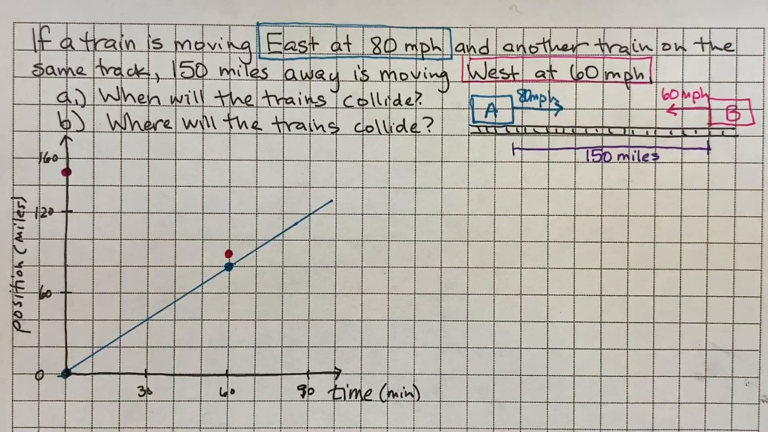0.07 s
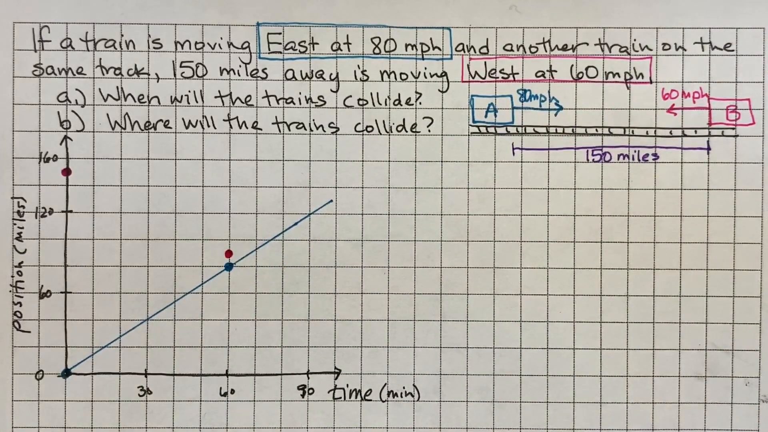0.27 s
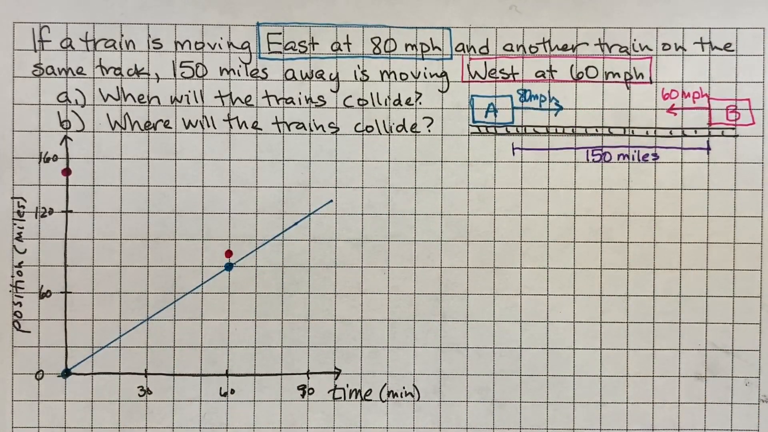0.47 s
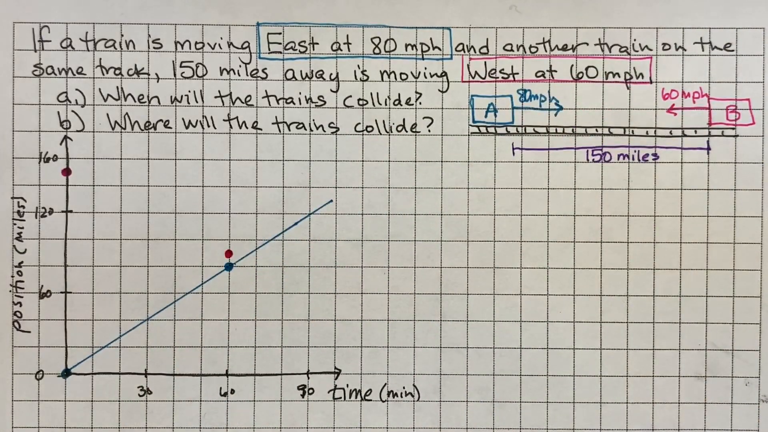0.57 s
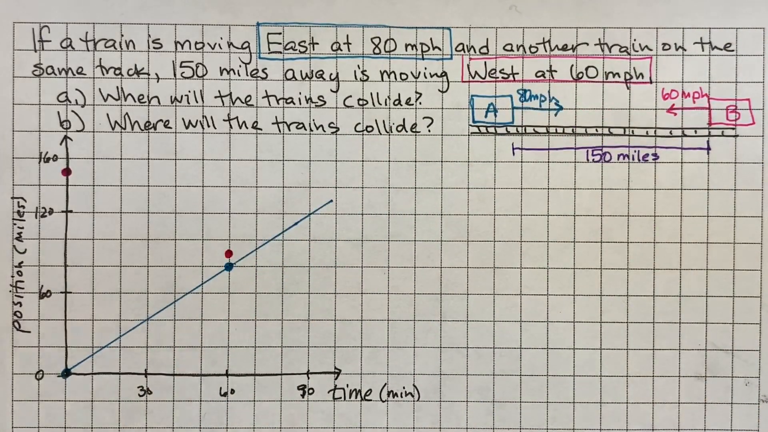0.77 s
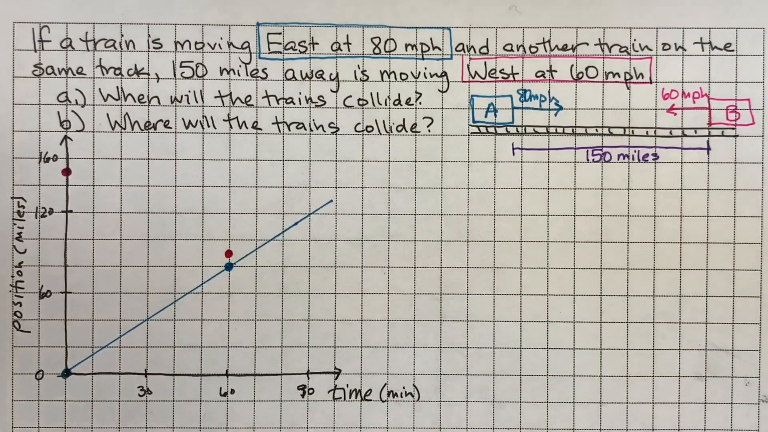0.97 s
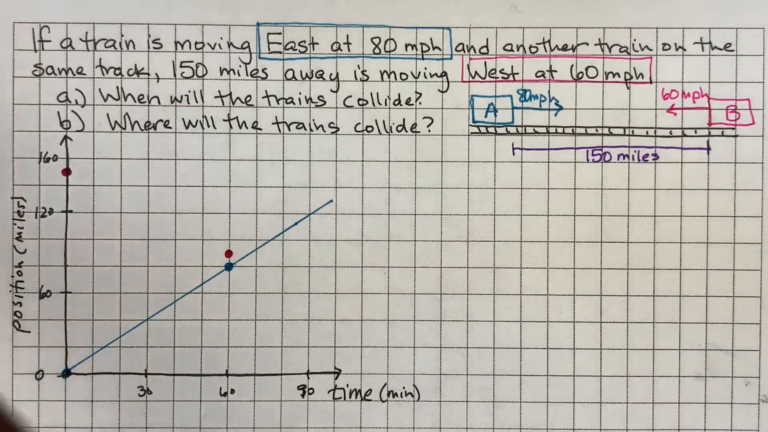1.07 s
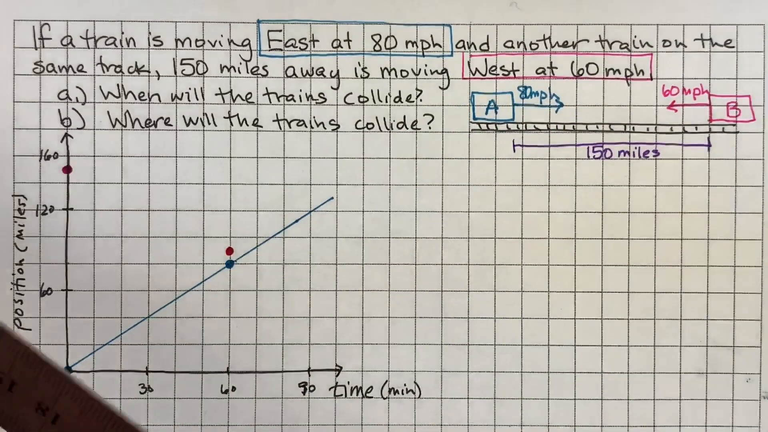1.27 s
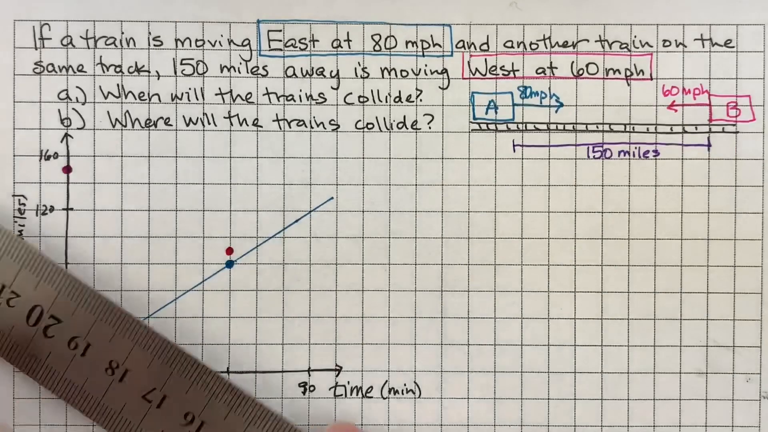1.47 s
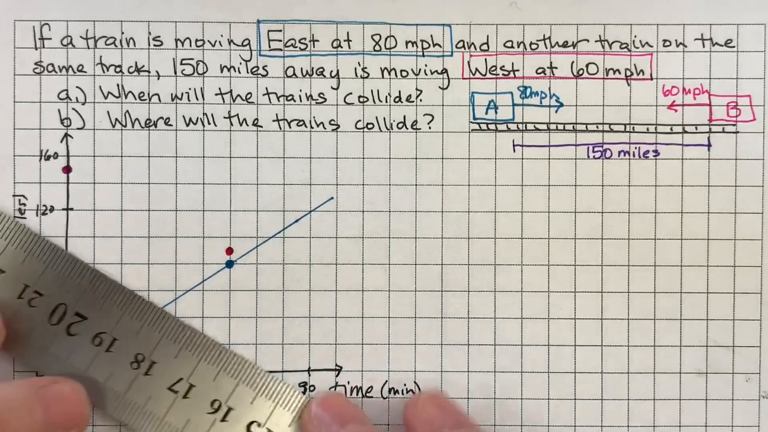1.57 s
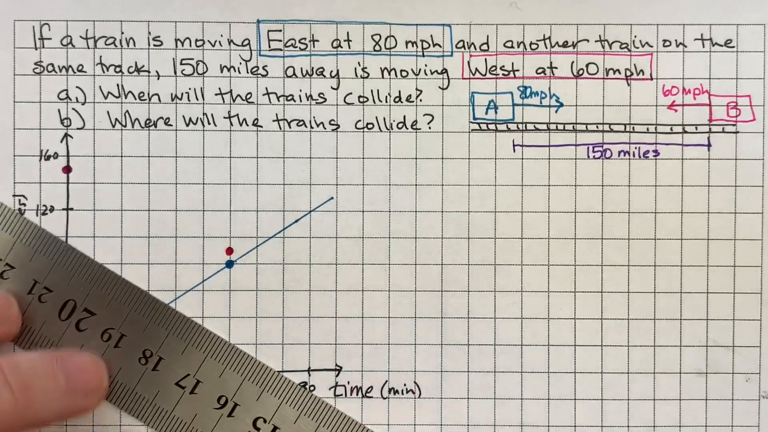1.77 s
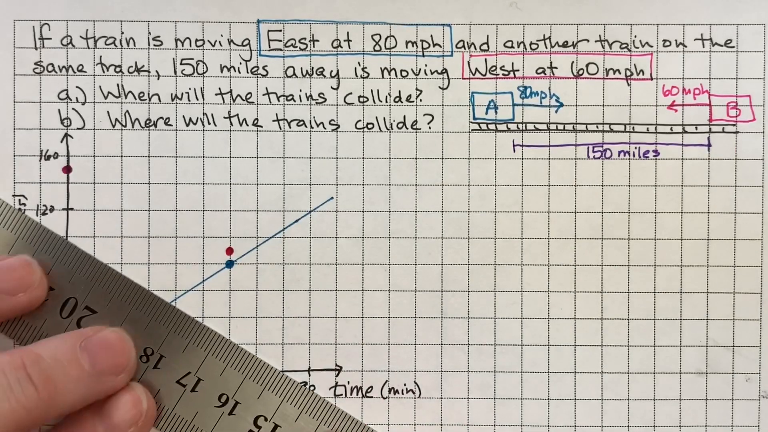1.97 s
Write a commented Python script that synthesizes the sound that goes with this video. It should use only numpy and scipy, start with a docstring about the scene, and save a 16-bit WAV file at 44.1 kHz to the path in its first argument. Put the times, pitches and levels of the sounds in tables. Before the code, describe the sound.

A thin steel ruler is laid on a papered desk, close in stereo. Faint gritty scrapes in the first 0.3 seconds end in tiny ticks. Quiet hand brushing follows, over soft ventilation and low hum. At 1.5 a click and short edge slide, at 1.59 a bright ringing strike, then rapid chatter from 1.61 to a flat slap with a low desk knock at 1.67, quickly damped; brief small-room tail, then faint brushing.

```python
"""A thin steel ruler is picked up and laid on paper on a desk, close to a stereo microphone in a quiet room.
Its edge ticks, strikes, chatters and slaps flat; each contact is a click spread into a falling bending-wave
chirp, a burst of decaying steel modes and a low knock of the desk. Filtered noise makes the ruler's scrapes,
the hollow bodies of two knocks, an edge slide and a hand brushing the paper. Ventilation noise and a mains
hum lie underneath."""
import sys
import numpy as np
from scipy import signal
from scipy.fft import rfft, irfft, next_fast_len
from scipy.io import wavfile
from scipy.ndimage import map_coordinates

SR = 44100
rng = np.random.default_rng(int(sys.argv[2]) if len(sys.argv) > 2 else 0)


def master_out(mix):
    """Clip the mix to full scale and print it as 16-bit PCM to the path in sys.argv[1]."""
    frames = np.transpose(np.atleast_2d(mix))
    ceiling = np.clip(frames, -1, 1)
    pcm = np.round(ceiling * 32767).astype(np.int16)
    wavfile.write(sys.argv[1], SR, pcm)


N = 89126
TIME = np.arange(N) / SR
RING_TIME = np.arange(SR // 4) / SR  # a quarter second for each contact


def amp(db):
    """Decibels to gain."""
    return 10 ** (np.asarray(db) / 20)


def unit(x):
    """Scale to rms 1."""
    return x / np.sqrt(np.mean(x ** 2) + 1e-20)


def fade(t, t60):
    """Exponential decay that starts at t = 0 and falls 60 dB in t60 seconds."""
    return np.exp(-np.log(1000) * np.maximum(t, 0) / t60)


def along(points, hz):
    """Read a curve of (frequency [Hz], value) points on a log frequency axis."""
    point_hz, value = np.transpose(points)
    return np.interp(np.log(hz + 1), np.log(point_hz + 1), value)


def filtered(x, response):
    """Multiply the spectrum of x by a complex response of frequency."""
    length = x.shape[-1]
    padded = next_fast_len(length + SR // 4)
    spectrum = rfft(x, padded) * response(np.fft.rfftfreq(padded, 1 / SR))
    return irfft(spectrum, padded)[..., :length]


def half_angle(alike, hz):
    """Half the angle whose cosine is the left-right likeness."""
    return np.arccos(np.clip(along(alike, hz), -1, 1)) / 2


def stereo(pair, alike):
    """Mix two unrelated signals to left and right of a given likeness."""
    def mid_side_gains(hz):
        turn = half_angle(alike, hz)
        return np.array([np.cos(turn), np.sin(turn)])

    mid, side = filtered(pair, mid_side_gains)
    return np.array([mid + side, mid - side])


def noise(spectrum, alike):
    """Coloured stereo noise of rms 1."""
    coloured = filtered(rng.standard_normal((2, N)), lambda hz: amp(along(spectrum, hz)))
    return unit(stereo(coloured, alike))


def wobble(rate):
    """A smooth random curve, rate knots a second."""
    return map_coordinates(rng.standard_normal(4096), [TIME * rate], mode="wrap")


def add(track, s, sound):
    """Mix a sound into a stereo track at s seconds."""
    part = track[:, round(s * SR):][:, :sound.shape[-1]]
    part += sound[..., :part.shape[1]]


# Colour of the ventilation: (frequency [Hz], relative level [dB])
AIR_COLOUR = [(15, -44), (30, -5.5), (90, -7), (123, -6), (146, -8), (286, -13.5), (323, -24), (682, -26),
              (1080, -20), (1280, -26), (8000, -47), (11000, -93.5)]
# Stereo width of ventilation, brushing and room tail: (frequency [Hz], left-right likeness [-1 to 1])
ROOM_LIKENESS = [(60, 0.97), (290, 0.99), (640, 0.19), (1400, 0.42), (15000, 0)]
AIR_DB, HUM_HZ, HUM_DB = -49.5, 119, -56
AIR_LAG_S = .0003  # the left channel hears the room tone this much later


def room_tone(waver_db=2):
    """Ventilation rumble and a slightly unsteady hum; the later left channel places both to the right."""
    hum = np.sqrt(2) * np.sin(2 * np.pi * HUM_HZ * TIME + 0.76 * wobble(5.8))
    hum = hum * amp(HUM_DB + waver_db * wobble(7.4))
    ventilation = amp(AIR_DB) * noise(AIR_COLOUR, ROOM_LIKENESS)
    sides = np.array([[-1], [1]])
    return filtered(ventilation + hum, lambda hz: np.exp(1j * np.pi * hz * AIR_LAG_S * sides))


# Decay of the small room: (frequency [Hz], t60 [s])
ROOM_DECAY = [(200, 0.54), (1000, 0.3), (8000, 0.4), (14000, 0.25)]
# Colour of its reverberation: (frequency [Hz], gain [dB])
ROOM_COLOUR = [(150, -4.5), (500, -7), (1500, -13.5), (3000, -9.5), (8000, -22.5), (14000, -20.5)]


def room(x, onset_s=0.0027):
    """A small room's tail: noise in which each frequency dies at its own speed, convolved with the sound."""
    hz, t, grains = signal.stft(rng.standard_normal((2, SR // 2)), SR, nperseg=256)
    decay = fade(t, along(ROOM_DECAY, hz)[:, None]) * (1 - np.exp(-t / onset_s))
    tail = signal.istft(grains * decay, SR, nperseg=256)[1]
    tail = stereo(tail, ROOM_LIKENESS)
    wet = signal.fftconvolve(x, tail / np.linalg.norm(tail[0]), axes=1)[:, :N]
    return filtered(wet, lambda hz: amp(along(ROOM_COLOUR, hz)))


# Strokes of the hand on the paper: (time of the peak [s], half length [s], level [dB])
HAND_STROKES = [(0.362, 0.016, -67), (0.623, 0.011, -67), (0.72, 0.02, -69.5), (1.02, 0.11, -69),
                (1.186, 0.026, -62.5), (1.318, 0.15, -69.5), (1.98, 0.12, -69)]
# Colour of skin on paper: (frequency [Hz], relative level [dB])
PAPER_COLOUR = [(1500, -6), (4000, -11), (6500, -12), (8800, 7), (10700, -8), (12500, 2.5), (14000, -5.5),
                (15500, -36)]


def brushing(rest_db=-78, grain_db=1.5):
    """Soft swells of skin on paper: grainy noise whose power follows the strokes above a faint floor."""
    power = amp(rest_db) ** 2
    for s, half_s, db in HAND_STROKES:
        power = power + amp(db) ** 2 * np.exp(-((TIME - s) / half_s) ** 2)
    return np.sqrt(power) * amp(grain_db * wobble(150)) * noise(PAPER_COLOUR, ROOM_LIKENESS)


# Hollow mid-band noise, the bodies of two light knocks and then one edge slide:
# (start [s], end [s], level [dB])
HOLLOW_BURSTS = [(0.297, .316, -55), (1.503, 1.512, -44), (1.512, 1.586, -57)]
# Stereo width of the ruler's direct sound: (frequency [Hz], left-right likeness [-1 to 1])
DIRECT_LIKENESS = [(900, 0.92), (2000, -0.57), (3200, -0.084), (5000, -0.15), (8000, -0.0069),
                   (14000, 0.081)]
HOLLOW_HZ, HOLLOW_WIDTH_HZ = 930, 590  # one resonant band, passed twice


def hollow_noise():
    """Bursts of noise through a resonant band: the hollow bodies of two light knocks, then one edge slide."""
    def band(hz):
        passed = 1j * hz * HOLLOW_WIDTH_HZ
        return (passed / (HOLLOW_HZ ** 2 - hz ** 2 + passed)) ** 2

    level = sum(amp(db) * ((TIME > start) & (TIME < end)) for start, end, db in HOLLOW_BURSTS)
    bursts = filtered(stereo(rng.standard_normal((2, N)), DIRECT_LIKENESS) * level, band)
    return unit(bursts) * np.sqrt(np.mean(level ** 2))


# Scrapes as the ruler is picked up: (time [s], length [s], rasp level [dB], hiss level [dB])
PICKUP_SCRAPES = [(0.027, 0.036, -55, -59), (0.08, .022, -43.5, -50), (0.117, 0.027, -42.5, -49.5),
                  (0.146, 0.035, -53.5, -65.5), (0.209, 0.046, -57.5, -63.5), (0.258, 0.027, -59.5, -54)]
# Colour of the mid rasp: (frequency [Hz], relative level [dB])
RASP_COLOUR = [(200, 0.5), (900, -16.5), (1800, -2.5), (2050, -16.5), (2500, 4), (3200, 2.5), (3800, -5.5),
               (4400, 2.5), (5300, -8.5), (15000, -47)]
# Colour of the metallic hiss: (frequency [Hz], relative level [dB])
HISS_COLOUR = [(6500, -45), (7600, 4), (8050, 1), (8370, 7), (9700, 0.5), (10700, -22), (12000, 4),
               (14200, -10), (15500, -37)]
SCRAPE_RISE, SCRAPE_T60 = 0.29, 0.067  # rise as a share of the stroke's length; decay after it [s]
RIPPLE_DB, RIPPLE_HZ = 7, 89.55  # greatest depth and spacing of the steel's resonances in a scrape


def scrapes(grain_db=1.5):
    """Short grainy slides of the steel: a resonant mid rasp and a metallic hiss."""
    rasp, hiss = np.zeros(N), np.zeros(N)
    for s, length, rasp_db, hiss_db in PICKUP_SCRAPES:
        rise = np.clip((TIME - s) / (SCRAPE_RISE * length), 0, 1)
        stroke = rise * fade(TIME - s - length, SCRAPE_T60)
        rasp += amp(rasp_db) * stroke
        hiss += amp(hiss_db) * stroke
    knots = rng.standard_normal(size=512)

    def ripple(hz):
        return amp(RIPPLE_DB * np.tanh(map_coordinates(knots, [hz / RIPPLE_HZ], mode="wrap")))

    def rub(spectrum):
        return unit(filtered(noise(spectrum, DIRECT_LIKENESS), ripple))

    return amp(grain_db * wobble(400.4)) * (rasp * rub(RASP_COLOUR) + hiss * rub(HISS_COLOUR))


# Contacts of the ruler, played by desk, snaps and ring: (time [s], snap level before the shared gain [dB],
# ring level [dB], ring tilt [dB per kHz], treble gain [dB], desk knock level [dB])
RULER_CONTACTS = [(.2705, -68, -52, 3, 0, -70), (.3017, -59, -59, 1, -10, -52),
                  (1.5026, -25.5, -42, -17, 1, -39), (1.5452, -49, -54, -4, -2, -60),
                  (1.5857, -26, -18, -1, 3, -35), (1.6113, -43, -32, 0, -1, -60),
                  (1.6338, -37, -39, 3, 8, -60), (1.6382, -21, -21, -1, -5, -46),
                  (1.6426, -38, -21.5, -2, -3, -47), (1.6470, -32, -23.5, 0, -2, -52),
                  (1.6530, -32, -20, 1, -5, -52), (1.6583, -38, -20, 0, -7, -52),
                  (1.6632, -29, -22, -4, -8, -43), (1.6709, -19.5, -24, -8, 3, -25)]
KICK_RAD = 0.92  # random phase: a contact's kick to each steel mode, and the waver of a desk knock
# Modes of the desk top: (frequency [Hz], relative level [dB], t60 [s])
DESK_MODES = [(120, -20, .2), (186, -14, .18), (318, -3, .11), (345, 1, .026), (245, -5, .035),
              (480, -5, .03), (900, -11, .03)]
DESK_LAG_S, DESK_WAVER_RATE = 0.00548, 70  # delay of the knock; knots of its waver per second


def desk(attack_s=0.001):
    """The desk top answers each contact through the paper with a low knock of decaying, wavering modes."""
    out = np.zeros((2, N))
    for s, *_, knock_db in RULER_CONTACTS:
        waver = KICK_RAD * wobble(DESK_WAVER_RATE)[:len(RING_TIME)]
        waver = waver - waver[0]
        knock = np.zeros(len(RING_TIME))
        for hz, db, t60 in DESK_MODES:
            knock += amp(db) * np.sin(2 * np.pi * hz * RING_TIME + waver) * fade(RING_TIME, t60)
        add(out, s + DESK_LAG_S, amp(knock_db) * knock * (1 - np.exp(-RING_TIME / attack_s)))
    return out


TREBLE_FROM_HZ, TREBLE_FULL_HZ = 8500, 11500  # range over which a contact's treble gain sets in


def treble(hz):
    """Share of a contact's treble gain at each frequency; that gain sets each contact's own brightness."""
    return np.clip((hz - TREBLE_FROM_HZ) / (TREBLE_FULL_HZ - TREBLE_FROM_HZ), 0, 1)


# Colour of a snap: (frequency [Hz], gain [dB])
SNAP_COLOUR = [(200, -21), (500, 0.5), (1000, 4.5), (1800, 1), (3000, 4), (5500, 7), (7500, 13), (10500, 6),
               (13000, 8), (16000, -8)]
STEEL_HZ = 8000  # centre of the bright ring, and the frequency that the chirp leaves in place
LAG_S = .0048  # travel time of a 1 kHz bending wave; it shortens with the root of frequency
TAIL_DB, TAIL_T60 = -5, .02  # noisy tail of a click: level and decay [s]
END_ECHO, END_ECHO_S = .6, .0013  # reflection from the ruler's end: share and mean delay


def ruler_snaps(gain_db=12):
    """A click, its inverted end echo and a noisy tail chirp downwards: steel carries treble faster than bass."""
    out = np.zeros((2, N))
    lead = SR // 100  # room for the treble that the chirp brings forward
    for s, snap_db, _, _, treble_db, _ in RULER_CONTACTS:
        click = rng.standard_normal((2, len(RING_TIME))) * fade(RING_TIME, TAIL_T60)
        click = stereo(click, DIRECT_LIKENESS)
        click *= amp(TAIL_DB) * np.sqrt(2) / np.linalg.norm(click)
        click[:, 0] += 1
        echo_s = END_ECHO_S * (.5 + rng.random())  # varies with the place struck
        click[:, round(echo_s * SR)] -= END_ECHO
        click = np.pad(click, ((0, 0), (lead, 0)))
        click = filtered(click, lambda hz: amp(treble_db * treble(hz)))
        add(out, s - lead / SR, amp(snap_db + gain_db) * click)

    def chirp(hz):
        # group delay is LAG_S * sqrt(1 kHz / hz), less its value at STEEL_HZ
        cycles = LAG_S * (2 * np.sqrt(1e3 * hz) - hz * np.sqrt(1e3 / STEEL_HZ))
        apart = np.array([[1], [-1]]) * half_angle(DIRECT_LIKENESS, hz)
        return amp(along(SNAP_COLOUR, hz)) * np.exp(1j * (apart - 2 * np.pi * cycles))

    return filtered(out, chirp)


CHOKE_T60 = 0.0052  # each contact damps the ring of the one before [s]
FLAT_S, PRESSED_T60 = 1.673, 0.014  # the ruler lies flat and the paper damps its ring [s]
SURGE, SURGE_T60 = 1.1, .012  # extra ring at the instant of contact: share and decay [s]


def ring(hz, db, t60, pan_db, blows, place_db=0, attack_s=0.00031):
    """Each blow (time, level, tilt, treble) rings the modes with a surge; the next blow or the paper damps them.

    The place struck is a random spread of about place_db in each mode's level."""
    out = np.zeros((2, N))
    modes = np.exp(2j * np.pi * hz[:, None] * RING_TIME) * fade(RING_TIME, t60[:, None])
    modes = modes * (1 - np.exp(-RING_TIME / attack_s))
    modes = modes * (1 + SURGE * fade(RING_TIME, SURGE_T60))
    pan = amp(np.array([pan_db, -pan_db]) / 2) / np.sqrt((amp(pan_db) + amp(-pan_db)) / 2)
    gain = amp(db) / np.linalg.norm(amp(db)) * pan
    apart = half_angle(DIRECT_LIKENESS, hz) * rng.choice([-1, 1], len(hz))
    above_khz = np.clip((hz - STEEL_HZ) / 1e3, -1, 1)  # the tilt stops 1 kHz either side
    ends = [row[0] for row in RULER_CONTACTS[1:]] + [np.inf]
    drift = 2 * np.pi * rng.random(len(hz))
    for (s, blow_db, tilt, treble_db), end in zip(blows, ends):
        drift = drift + KICK_RAD * rng.standard_normal(len(hz))
        # modes run on from blow to blow, apart from the kick
        phase = drift + 2 * np.pi * hz * round(s * SR) / SR + np.array([apart, -apart])
        mode_db = blow_db + tilt * above_khz * (1 - treble(hz)) + treble_db * treble(hz)
        mode_db = mode_db + place_db * rng.standard_normal(len(hz))
        sound = ((gain * amp(mode_db) * np.exp(1j * phase)) @ modes).imag
        add(out, s, sound * fade(RING_TIME + s - end, CHOKE_T60))
    return out * fade(TIME - FLAT_S, PRESSED_T60)


# Strong steel modes: (frequency [Hz], relative level [dB], left-right difference [dB])
STRONG_MODES = [(7100, -10, 3), (7260, -5, -2), (7406, -6, -1), (7575, -4, 1), (7994, 0, 0), (8053, -5, 2),
                (8183, -5, 4), (8389, -1, 11), (8850, -11, -4), (9506, -13, 5), (9734, -12, 7),
                (10457, -18, -3), (11327, -11, 0), (13276, -15, 0)]
# Low bending modes: (frequency [Hz], relative level [dB])
LOW_MODES = [(985, -6), (1297, -2), (1610, 2), (1930, 1), (3671, -3), (4300, -3), (4850, -5), (5378, -4)]
# Colour of the bed of weak bending modes: (frequency [Hz], relative level [dB])
WEAK_COLOUR = [(900, -13), (1800, -7), (2800, -14), (4200, -12), (6200, -13), (8000, 1), (10700, -2),
               (13000, 1), (16000, -10)]
# Ring time of the weak modes: (frequency [Hz], t60 [s])
WEAK_DECAY = [(1800, 0.27), (8000, 0.25), (14000, 0.065)]
STEEL_T60, DAMPING_POWER = .12, 1.2  # decay at STEEL_HZ [s]; how steeply it shortens with frequency
LOW_DB, LOW_T60, WEAK_DB = -9, 0.09, -4
PLACE_DB = 3  # spread of the low and weak modes from blow to blow
TOP_HZ = 16300  # top of the weak modes and upper limit of the sound


def ruler_ring(count=80, scatter_db=3):
    """The steel's decaying modes: a bright cluster of strong ones, a few low ones and a dense weak bed."""
    s, snap_db, ring_db, tilt, treble_db, _ = np.transpose(RULER_CONTACTS)
    hz, db, pan_db = np.transpose(STRONG_MODES)
    t60 = STEEL_T60 * (STEEL_HZ / hz) ** DAMPING_POWER
    strong = ring(hz, db, t60, pan_db, zip(s, ring_db, tilt, treble_db))

    hz, db = np.transpose(LOW_MODES)
    low_blows = zip(s, (snap_db + ring_db) / 2, 0 * s, treble_db)
    low = ring(hz, db, np.full(len(hz), LOW_T60), 0 * hz, low_blows, PLACE_DB)

    hz = (np.arange(count) + 2 + rng.random(count)) * TOP_HZ / (count + 2)
    db = along(WEAK_COLOUR, hz) + scatter_db * rng.standard_normal(count)
    weak_blows = zip(s, ring_db, 0 * s, treble_db)
    weak = ring(hz, db, along(WEAK_DECAY, hz), 0 * hz, weak_blows, PLACE_DB)
    return strong + amp(LOW_DB) * low + amp(WEAK_DB) * weak


def scene():
    """Ruler and desk with their reverberation, over the hand and the room tone."""
    near = ruler_ring() + ruler_snaps() + desk() + scrapes() + hollow_noise()
    return near + room(near) + brushing() + room_tone()


# Colour difference of the two channels: (frequency [Hz], left minus right [dB])
CHANNEL_BALANCE = [(200, 2), (1000, -3.5), (5000, -0.5), (8000, 1.5), (13000, 0.5)]


def record(dry):
    """The two channels differ a little in colour, with nothing at or above TOP_HZ."""
    sides = np.array([[1], [-1]])
    return filtered(dry, lambda hz: amp(sides * along(CHANNEL_BALANCE, hz) / 2) * (hz < TOP_HZ))


dry = scene()
out = record(dry)
master_out(out)
```